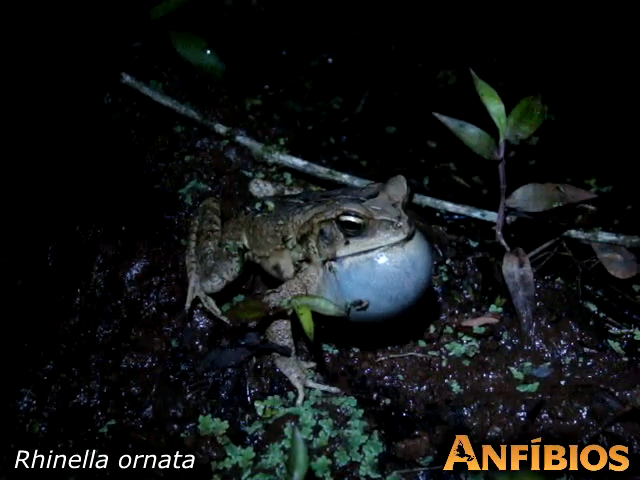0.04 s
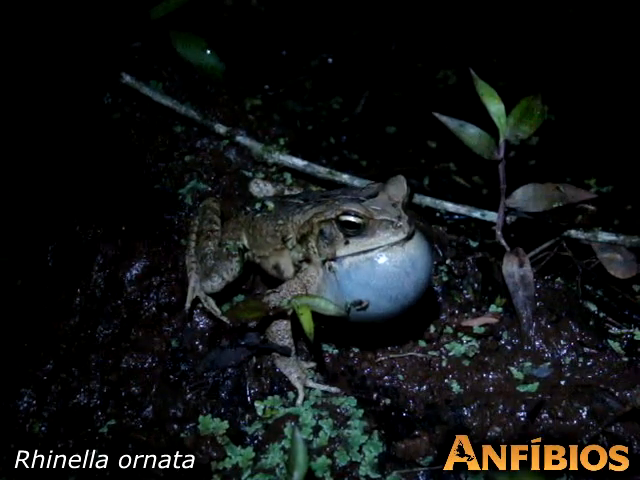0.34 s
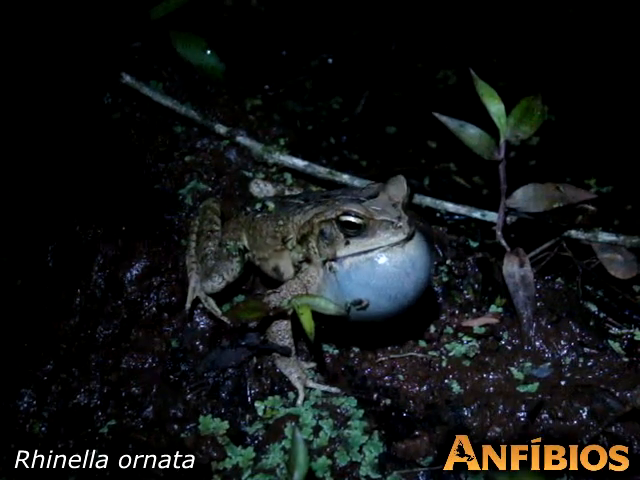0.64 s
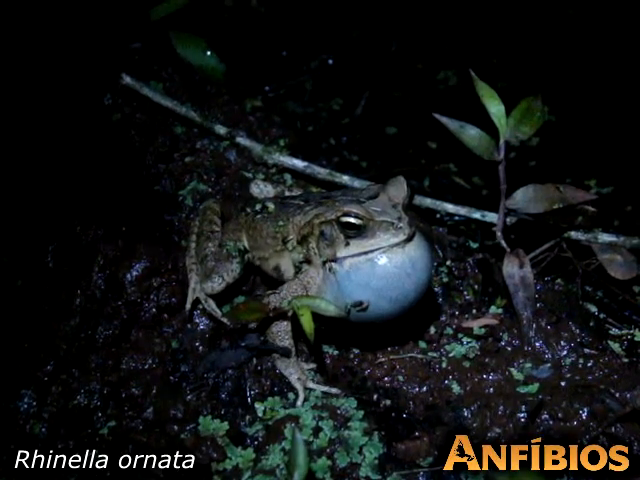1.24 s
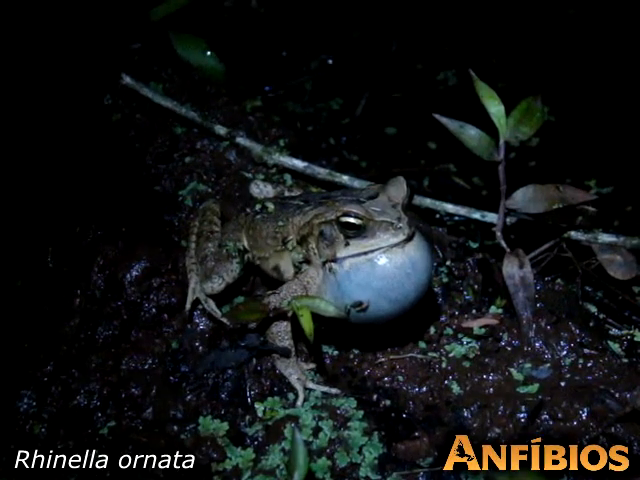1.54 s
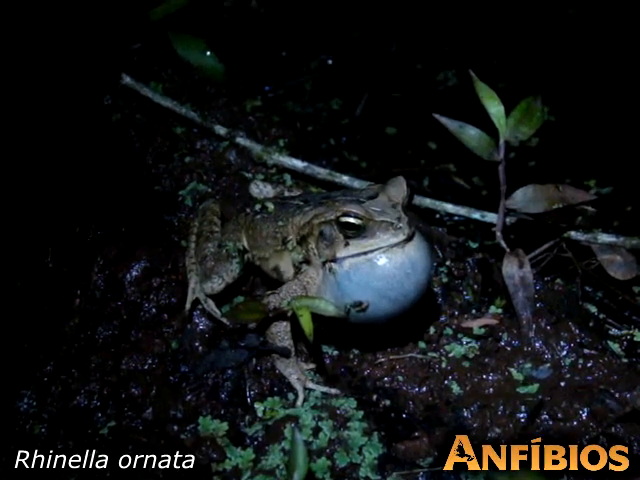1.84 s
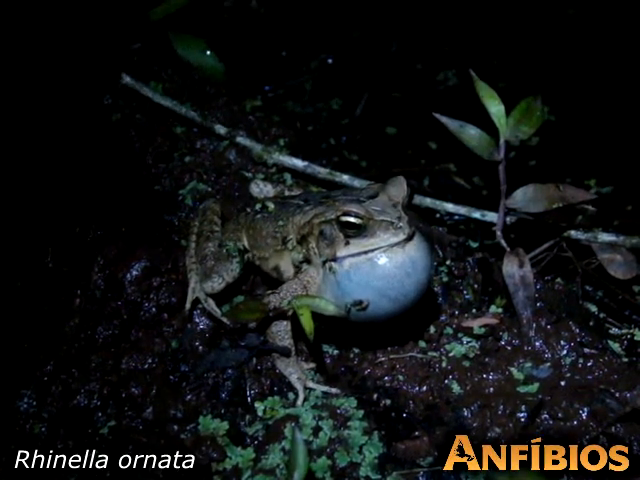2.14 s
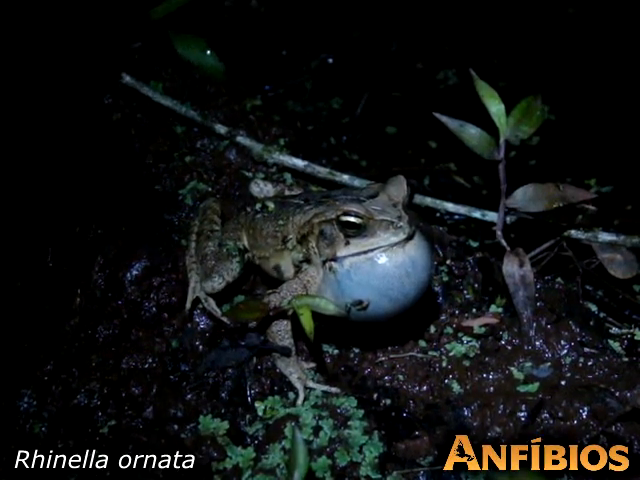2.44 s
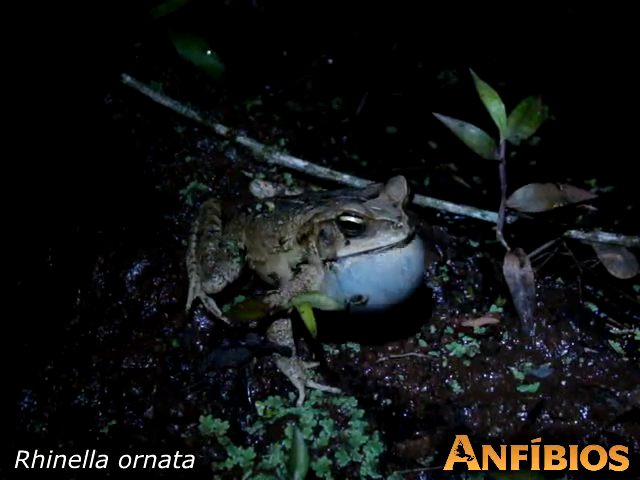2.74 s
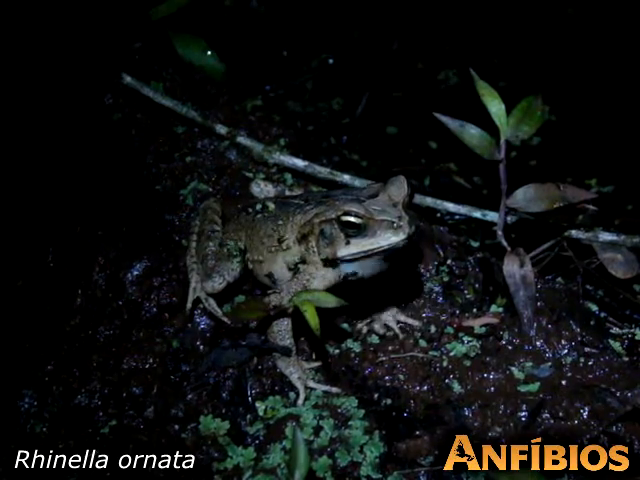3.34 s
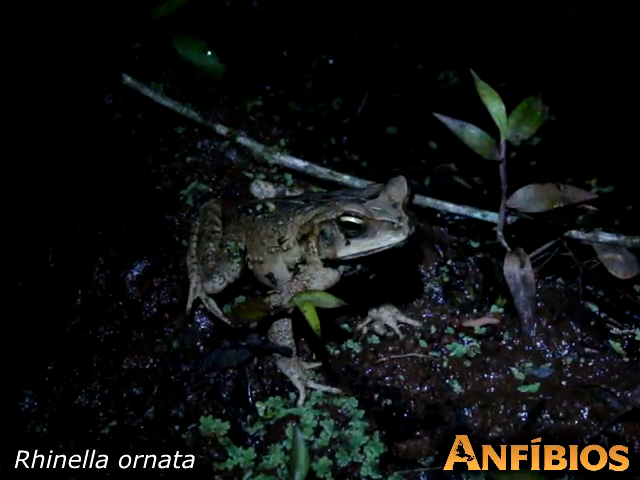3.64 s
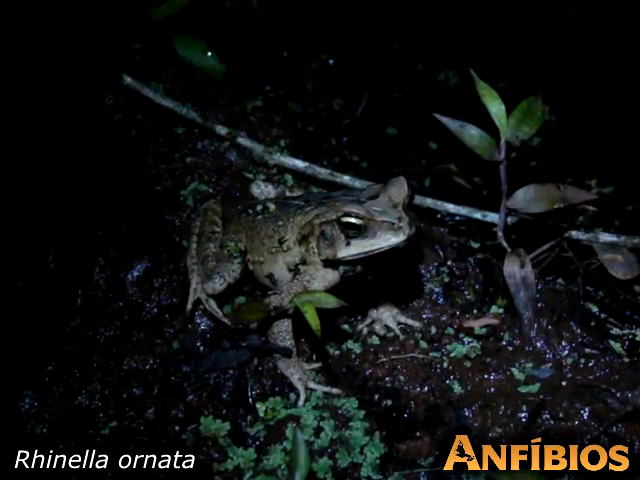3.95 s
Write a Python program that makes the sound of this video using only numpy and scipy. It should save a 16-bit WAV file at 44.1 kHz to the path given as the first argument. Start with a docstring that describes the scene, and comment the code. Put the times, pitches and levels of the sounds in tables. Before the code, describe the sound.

A toad gives a loud, rapid, steady trill close to the microphone, outdoors at night. It stops, and a distant chorus of frogs carries on with low croaks and high chirps over faint insects.

```python
"""A toad trills close to the microphone at night, fourteen notes a second, and then stops.
Each note is a burst of five pulses that ring its vocal sac, the pouch of air at its throat.
Farther off, a chorus of frogs croaks low and chirps high among the trees,
over the thin tones of insects and a faint hiss."""
import sys
import numpy as np
from scipy import signal
from scipy.fft import rfft, irfft
from scipy.io import wavfile
from scipy.ndimage import uniform_filter1d, minimum_filter1d

SR = 44100
rng = np.random.default_rng(int(sys.argv[2]) if len(sys.argv) > 2 else 0)


def generate_wav(sig):
    """Save sig (samples, or channels by samples) to the path in sys.argv[1] as 16-bit PCM at SR."""
    pcm = np.round(np.clip(np.atleast_2d(sig).T, -1, 1) * 32767).astype(np.int16)
    wavfile.write(sys.argv[1], SR, pcm)


N = 176400


def toad():
    """The trill: the sac rings note after note, with faint overtones and a rasp of air."""
    # the toad's notes: t/s, relative level/dB of the note's last pulse
    notes = [(0.0242, -8.0), (0.0938, -3), (0.1656, 0.5), (0.2364, -0.5), (0.3066, -4), (0.3763, -11.5),
             (0.4461, 0.5), (0.5166, 1), (0.5876, -1.5), (0.658, -2.5), (0.729, -1.5), (0.8005, 0),
             (0.8705, -2.5), (0.94, -3.5), (1.0135, 0), (1.0846, -8), (1.1545, -5.5), (1.2251, -7),
             (1.2963, -2), (1.3687, -5.5), (1.44, -6.5), (1.5075, -4.5), (1.578, -1), (1.6514, 3),
             (1.7219, 0), (1.7933, 0), (1.8642, 0.5), (1.936, -1), (2.0063, -9.5), (2.0775, -3),
             (2.1493, -2.5), (2.219, -6), (2.2901, -7.5), (2.3611, -2.5), (2.4321, -2.5), (2.5029, -13),
             (2.5745, -4), (2.6482, -6.5), (2.7202, -19), (2.7932, -3.5)]
    # tone colour of the air rasp on each pulse: f/Hz, relative level/dB
    rasp_colour = [(30, -10), (160, -7), (300, -17), (900, -1.5), (2300, 8.5), (2900, 3), (3500, -16),
                   (4300, -10), (4700, -6.5), (5100, -13.5), (5600, -15), (7000, -24), (7900, -6),
                   (8800, -23), (10000, -30), (11000, -48)]
    pitch_hz, sink_hz_per_s = 1540.8, 7.05  # the pitch sinks slowly through the trill
    low_ring_hz, low_ring_width_hz = 1304, 37
    motion = np.zeros(N, complex)
    for start, last_db in notes:
        add(motion, start, toad_note(pitch_hz - sink_hz_per_s * start, last_db))
    strength, phase = abs(motion), np.angle(motion)
    # the sac gives off little bass
    ring = signal.sosfilt(signal.butter(2, 515, "high", fs=SR, output="sos"), motion.imag)
    # a lower tone of the sac rings on between the notes
    low_filter = signal.iirpeak(low_ring_hz, low_ring_hz / low_ring_width_hz, fs=SR)
    low_ring = amp(-6.5) * signal.lfilter(*low_filter, ring)
    overtones = amp(-41) * np.sin(2 * phase) + amp(-44) * np.sin(3 * phase)
    rasp = amp(-34) * noise(rasp_colour)
    return amp(-2.5) * (ring + low_ring + strength ** 2 * (overtones + rasp))


def toad_note(hz, last_db, pulses=5):
    """Pulses ring the sac and drift out of step. The complex result holds strength and phase."""
    gap_s, jitter_s, rise_s, ring_s = 0.00667, 0.00034, 0.0014, 0.0068
    t = np.arange(SR // 16) / SR
    motion = np.zeros(len(t), complex)
    # each pulse is a little off in timing, phase, level and pitch
    for k, (late, slip, louder, detune) in enumerate(rng.standard_normal((pulses, 4))):
        first, last = k == 0, k == pulses - 1
        start = 0.00042 if first else k * gap_s + jitter_s * late
        age = np.maximum(t - start, 0)
        swell_s = rise_s * (1.234 if first or last else 1)
        swell = np.sin(np.pi / 2 * np.minimum(age / swell_s, 1)) ** 2
        fade = np.exp(-(age / ring_s) ** 1.37)
        level_db = 1.2 * louder + last * (last_db - 1)  # the last pulse is usually weaker
        sag = 1 - 0.0084 * (k - 2)  # the pitch sags as the air runs out
        pitch_ratio = (0.94 if last else 0.98 * sag) + 0.0073 * detune
        start_cycles = 1.012 * hz * np.sqrt(sag) * start  # nearly in step with the pulse before
        cycles = start_cycles + hz * pitch_ratio * age
        phase = 2 * np.pi * cycles + 0.15 * k * slip
        motion += amp(level_db) * swell * fade * np.exp(1j * phase)
    return motion


def echoes(sound, fade_s):
    """Scattered echoes that fall 60 dB in fade_s; they shift as the toad's body moves."""
    t, out = np.arange(SR // 2) / SR, np.zeros(N)
    for k in range(4):  # the sound glides between four echo patterns
        bounces = rng.standard_normal(len(t)) * (rng.random(len(t)) < 1 / 20)
        bounces *= 10 ** (-3 * t / fade_s)
        share = np.cos(np.pi * (np.arange(N) / SR + k / 4)) / np.sqrt(2)
        out += signal.fftconvolve(sound * share, bounces / np.linalg.norm(bounces))[:N]
    return out


def croaks():
    """Far frogs croak: short swells of low, grainy noise."""
    # the croaks: t/s, length/s, level/dB
    calls = [(2.854, 0.058, -34.5), (2.968, 0.043, -35), (3.014, 0.051, -28), (3.178, 0.03, -35.5),
             (3.252, 0.048, -25.5), (3.312, 0.068, -33.5), (3.37, 0.061, -29.5), (3.442, 0.048, -27.5),
             (3.557, 0.025, -24.5), (3.598, 0.029, -23.5), (3.637, 0.033, -27), (3.697, 0.086, -31.5),
             (3.786, 0.053, -29), (3.851, 0.031, -29), (3.925, 0.15, -30)]
    # tone colour of the croaks: f/Hz, relative level/dB
    colour = [(100, -39), (290, -36), (330, -19), (365, 7), (400, 0), (450, -1), (560, -5.5), (680, -13.5),
              (850, -2.5), (1130, 1), (1350, -0.5), (1600, -10.5), (2000, -18.5), (2600, -59),
              (5000, -52.5)]
    t, power = np.arange(N) / SR, np.zeros(N)
    for start, length, db in calls:
        power += (amp(db) * far_call_shape(t - start, length, rise_s=0.015, tail_s=0.021)) ** 2
    grain = unit(np.exp(0.28 * flutter(N, rate_hz=47)))
    return np.sqrt(power) * grain * noise(colour)


def chirps():
    """Small frogs chirp: each call is one rasping whistle, blurred by distance."""
    # the chirps: t/s, length/s, pitch f/Hz, band width/Hz, level/dB
    calls = [(0.172, 0.11, 4820, 220, -45), (0.261, 0.048, 4990, 220, -38), (.55, 0.089, 3000, 280, -49),
             (0.758, 0.03, 4720, 150, -46.5), (0.793, 0.048, 4830, 110, -39.5),
             (1.073, 0.068, 2900, 260, -45.5), (1.25, 0.072, 2470, 160, -46.5),
             (1.269, 0.035, 4950, 268, -37.5), (1.331, 0.047, 4950, 150, -62), (1.361, .07, 3040, 320, -45),
             (1.573, 0.056, 5350, 200, -52), (1.703, 0.094, 2860, 287, -52), (1.745, 0.063, 4000, 280, -45),
             (1.959, 0.12, 3800, 250, -54), (2.066, 0.1, 4050, 280, -43.5), (2.277, .06, 2950, 280, -50.5),
             (2.296, 0.031, 4710, 121, -47), (2.491, 0.034, 4080, 200, -41.5), (2.746, .04, 2850, 201, -43),
             (2.808, 0.046, 4330, 280, -46), (2.965, 0.031, 2950, 170, -45.5),
             (3.066, 0.023, 2810, 130, -46), (3.187, 0.026, 2960, 220, -43.5),
             (3.259, 0.18, 4900, 260, -50), (3.322, .05, 2420, 200, -46.5), (3.37, 0.063, 3000, 240, -38.5),
             (3.408, 0.077, 4020, 320, -39), (3.562, .06, 3210, 241, -40.5),
             (3.609, 0.033, 2810, 300, -39.5), (3.694, 0.1, 4170, 221, -44),
             (3.784, 0.023, 2990, 180, -39.5), (3.799, 0.011, 4090, 110, -36),
             (3.848, 0.034, 4040, 280, -46.5), (3.974, 0.033, 3100, 220, -41)]
    t, out = np.arange(SR // 2) / SR, np.zeros(N)
    for start, length, hz, width_hz, db in calls:
        tone = whistle(len(t), hz, width_hz)
        grain = np.exp(0.1 * flutter(len(t), rate_hz=120))
        shape = far_call_shape(t, length, rise_s=0.014, tail_s=0.046)
        add(out, start, amp(db) * shape * unit(tone * grain))
    return out


def chorus():
    """The farthest frogs merge into a wash of noise that swells in patches."""
    # tone colour of the whole far chorus: f/Hz, relative level/dB
    colour = [(20, -26.5), (150, -31), (280, -25), (325, -20.5), (365, 5.5), (400, 3.5), (450, 0),
              (560, -5.5), (680, -8.5), (850, -1), (1130, 3), (1350, 3), (1600, -10.5), (2200, -18.5),
              (2900, -11.5), (3500, -21.5), (4300, -24), (4650, -22), (5050, -26.5), (5700, -43.5),
              (7000, -53)]
    patch_db = 2.4
    frames, bands = N // 256 + 5, 513  # a grid of moments and pitches
    real, imag, patches = rng.standard_normal((3, frames, bands)).transpose(0, 2, 1)
    patches = uniform_filter1d(patches, size=14, axis=0)  # smooth across pitch
    patches = unit(uniform_filter1d(patches, size=14, axis=1))  # and across time
    grid = (real + 1j * imag) * amp(patch_db * patches)
    wash = signal.istft(grid, nperseg=1024, noverlap=768)[1][:N]
    return amp(-34.5) * tint(wash, colour)


def insects():
    """Far insects sing thin, throbbing tones."""
    # the insects: pitch f/Hz, throb rate/Hz, level/dB
    singers = [(4282, 17, -59.5), (5034, 10, -66)]
    t, out = np.arange(N) / SR, np.zeros(N)
    for hz, throb_hz, db in singers:
        throb = 1 + 0.45 * np.sin(2 * np.pi * throb_hz * t)
        out += amp(db) * whistle(N, hz, width_hz=50) * throb
    return out


def far_call_shape(t, length, rise_s, tail_s):
    """A call swells, holds, and dies away among the trees."""
    return np.clip(t / rise_s, 0, 1) * np.exp(-np.maximum(t - length, 0) / tail_s)


def whistle(count, hz, width_hz):
    """Noise squeezed into a narrow band around one pitch."""
    offset = (np.fft.rfftfreq(count, 1 / SR) - hz) / width_hz
    spectrum = rfft(rng.standard_normal(count)) / (1 + offset ** 2 + (offset / 2) ** 4)
    return unit(irfft(spectrum, count))


def flutter(count, rate_hz):
    """A smooth random wobble, up to about the given rate."""
    hz = np.fft.rfftfreq(count, 1 / SR)
    return unit(irfft(rfft(rng.standard_normal(count)) * np.exp(-(hz / rate_hz) ** 2), count))


def noise(colour):
    """Steady noise of a given tone colour."""
    return tint(rng.standard_normal(N), colour)


def tint(sound, colour):
    """Shapes a sound's lows and highs by a table of f/Hz, level/dB; the result has strength one."""
    table_hz, table_db = np.transpose(colour)
    hz = np.fft.rfftfreq(N, 1 / SR)
    db = np.interp(np.log(hz + 1), np.log(table_hz + 1), table_db)
    return unit(irfft(rfft(sound) * amp(db), N))


def amp(db):
    """Turns decibels into a number to multiply by."""
    return 10 ** (np.asarray(db) / 20)


def unit(x):
    """Scales a signal to an average strength (rms) of one."""
    return x / np.sqrt(np.mean(x ** 2) + 1e-20)


def add(mix, start_s, sound):
    """Mixes a sound in at a given time."""
    part = mix[max(round(start_s * SR), 0):][:len(sound)]
    part += sound[:len(part)]


def scene():
    """The near toad with its echoes, and the frogs and insects behind it."""
    trill = toad()
    scatter = amp(-17) * echoes(trill, fade_s=0.041)  # off ground and leaves
    forest = amp(-25.5) * echoes(trill, fade_s=1)
    near = trill + scatter + forest
    add(near, start_s=0.00219, sound=amp(-16.5) * trill)  # one bounce off the ground
    return (near + croaks() + chirps() + insects() + chorus())[None]


def record(dry):
    """The recorder holds down the peaks, adds a faint high copy and hiss, and cuts the top treble."""
    # tone colour of the microphone's hiss: f/Hz, relative level/dB
    hiss_colour = [(20, -5), (5000, 2.5), (8000, 1), (9900, -1.5), (10200, -32.5), (15000, -35)]
    ceiling, mirror_hz, cutoff_hz = 0.86, 16000, 15200
    gain = np.minimum(ceiling / (abs(dry) + 1e-9), 1)
    gain = minimum_filter1d(gain, size=130)  # stay low around each peak
    gain = uniform_filter1d(uniform_filter1d(gain, size=60), size=60)  # ease down and back up
    held = dry * gain
    # the high copy is a mirror image: a tone at f shows up again at mirror_hz - f
    treble = np.diff(held, 2, prepend=0, append=0)
    mirror = amp(-25) * treble * 2 * np.cos(2 * np.pi * mirror_hz * np.arange(N) / SR)
    hiss = amp(-59) * noise(hiss_colour)
    treble_cut = signal.firwin(511, cutoff_hz, window=("kaiser", 9), fs=SR)
    return signal.oaconvolve(held + mirror + hiss, treble_cut[None], "same")


dry = scene()
out = record(dry)
generate_wav(out)
```